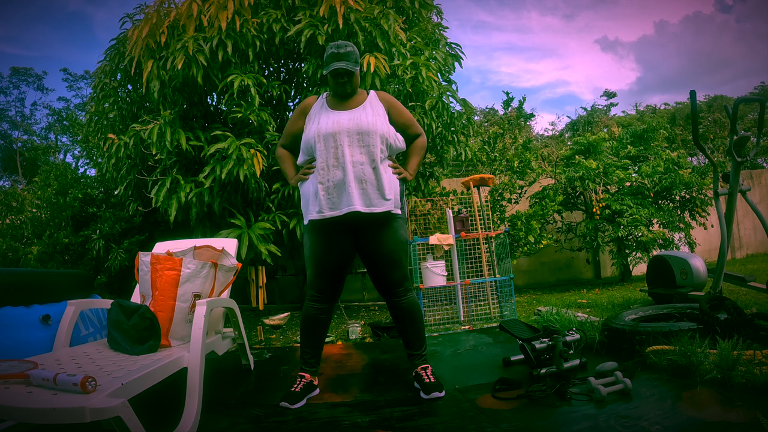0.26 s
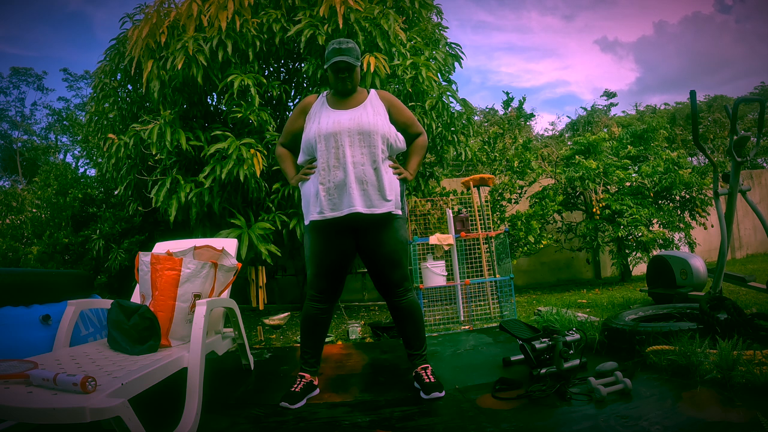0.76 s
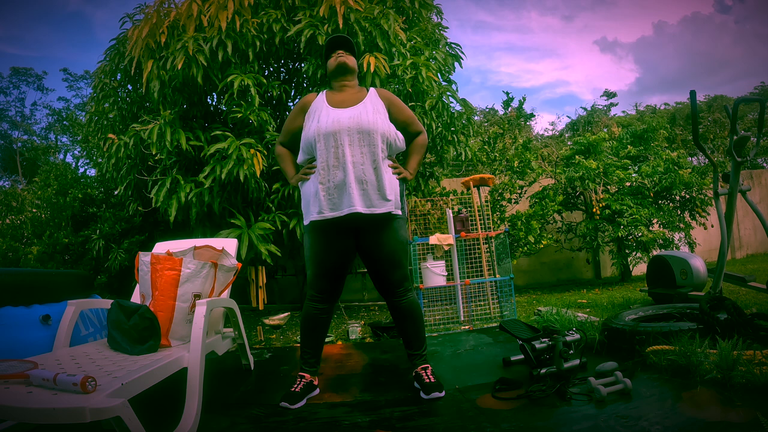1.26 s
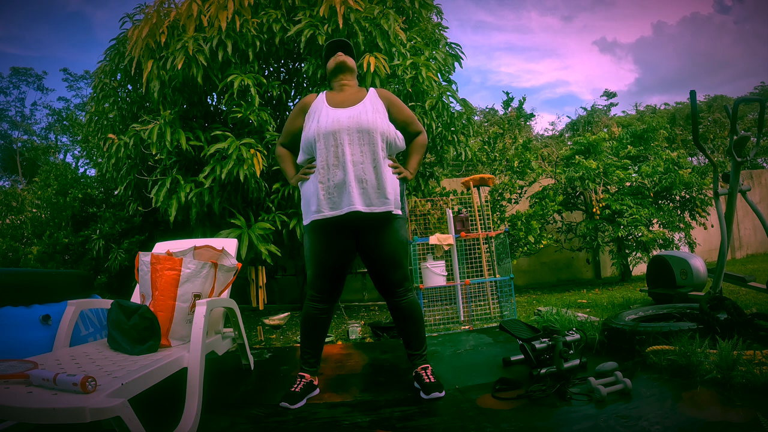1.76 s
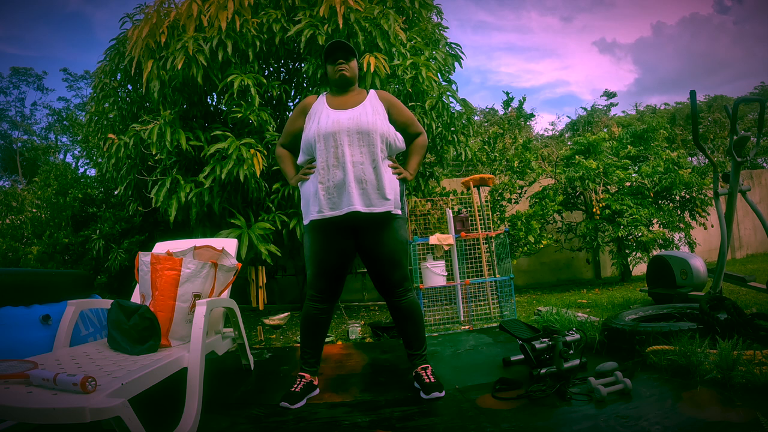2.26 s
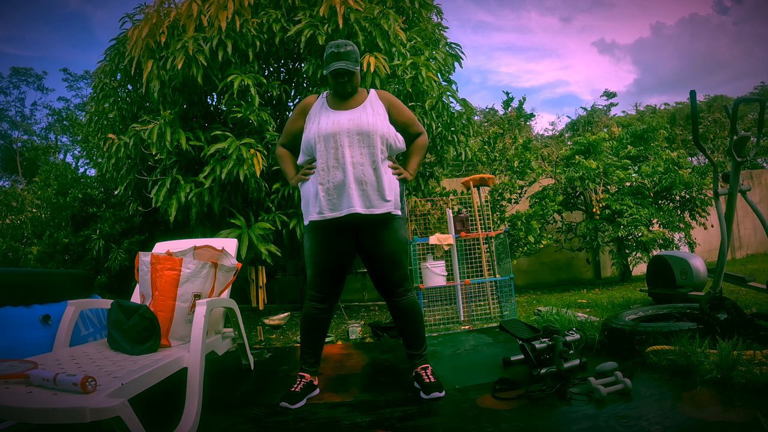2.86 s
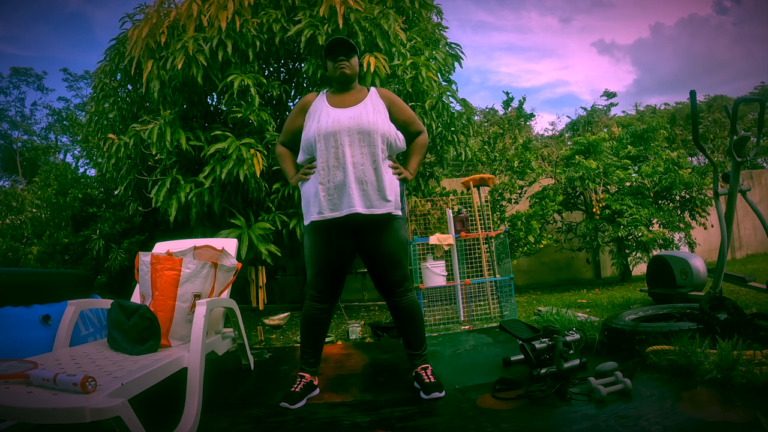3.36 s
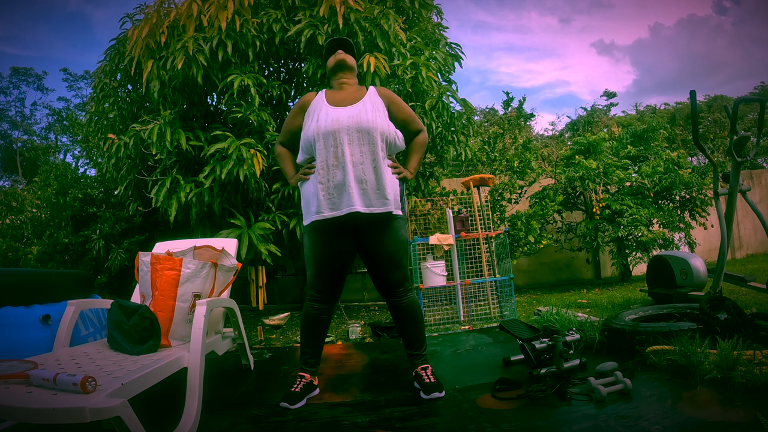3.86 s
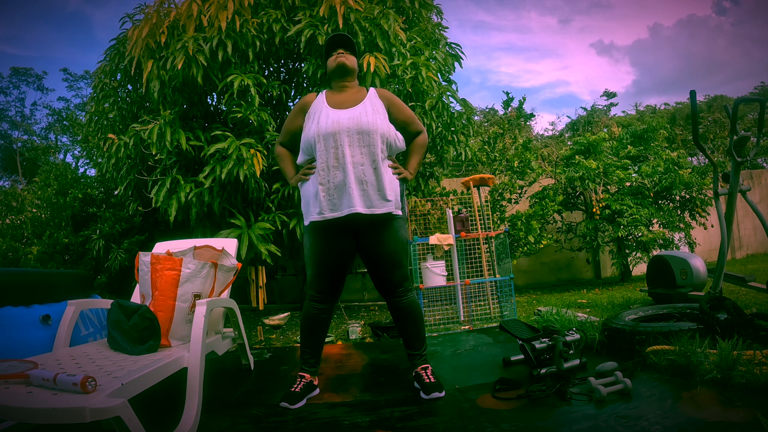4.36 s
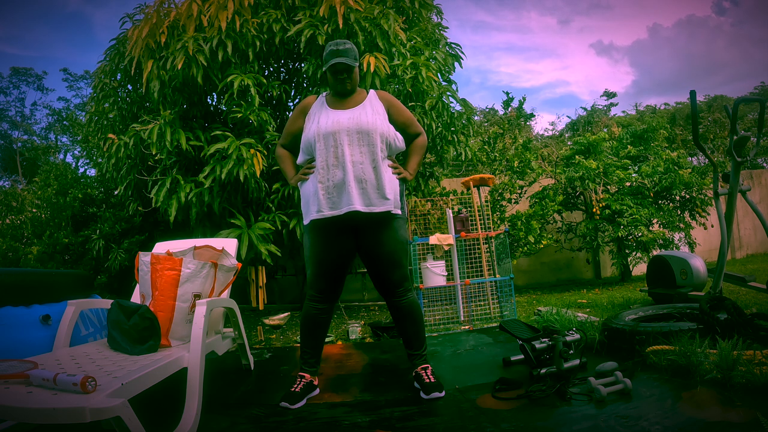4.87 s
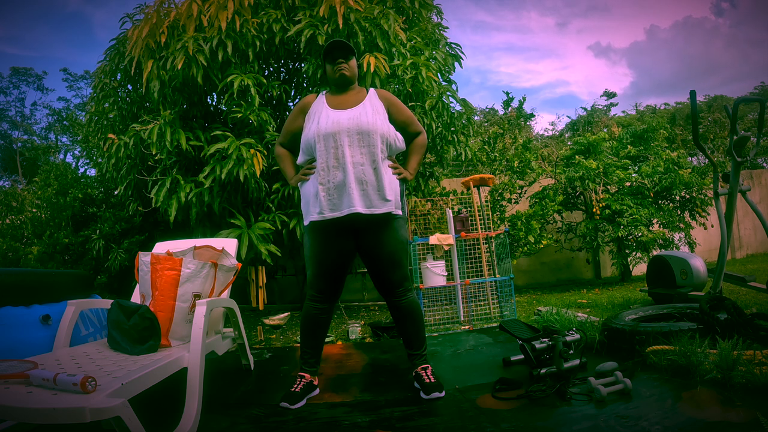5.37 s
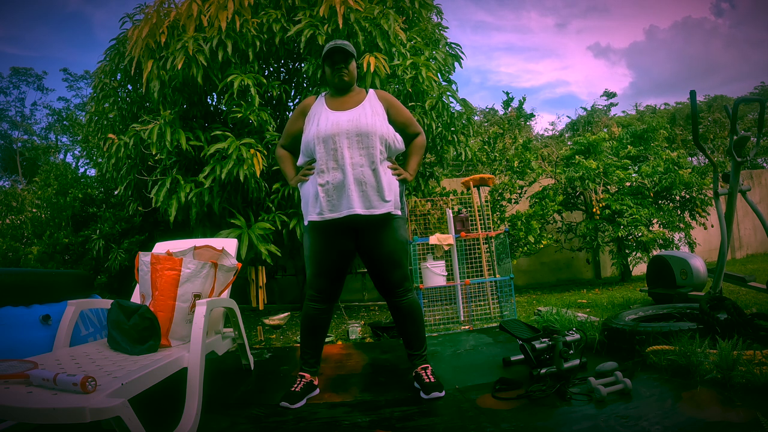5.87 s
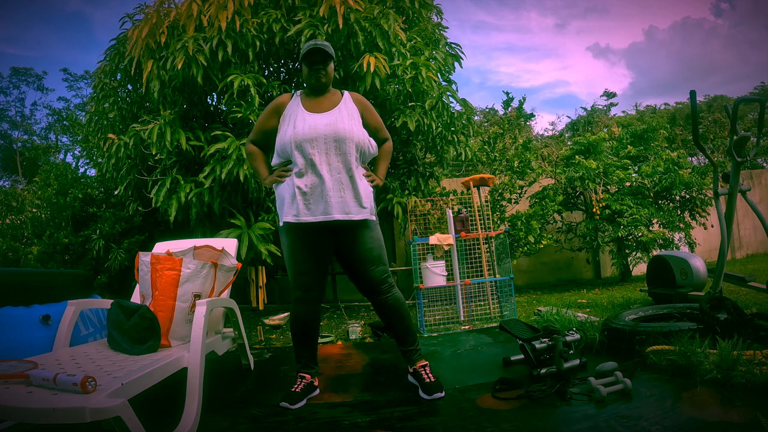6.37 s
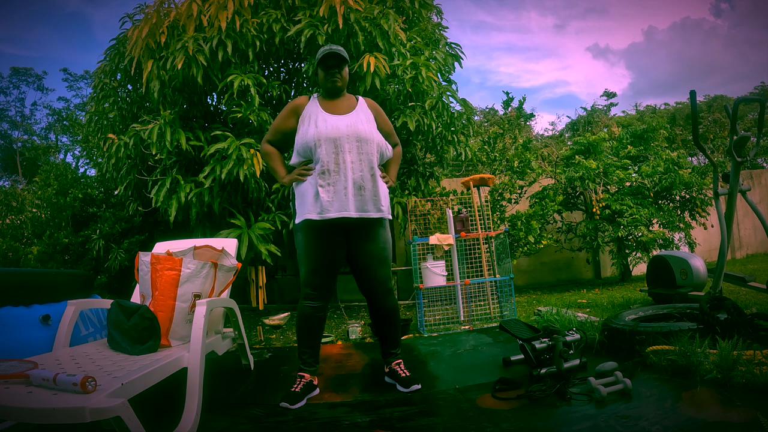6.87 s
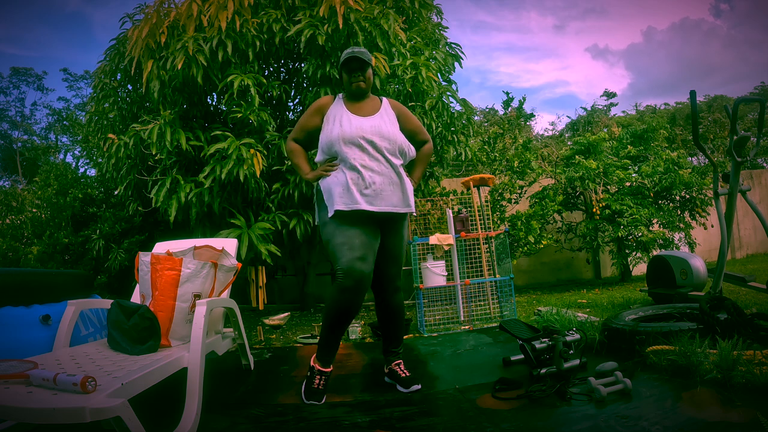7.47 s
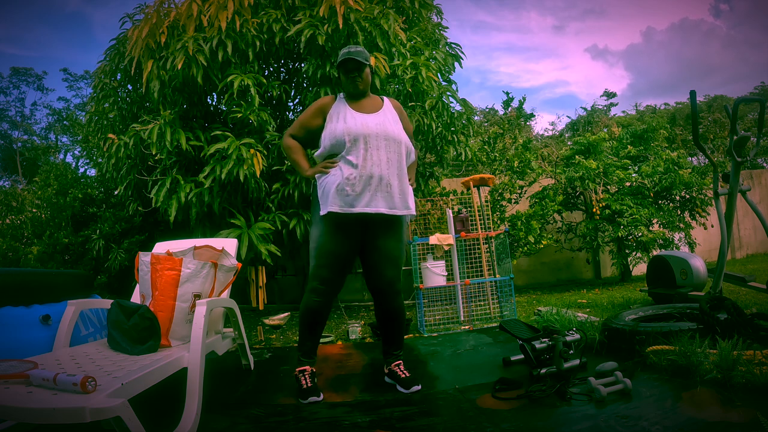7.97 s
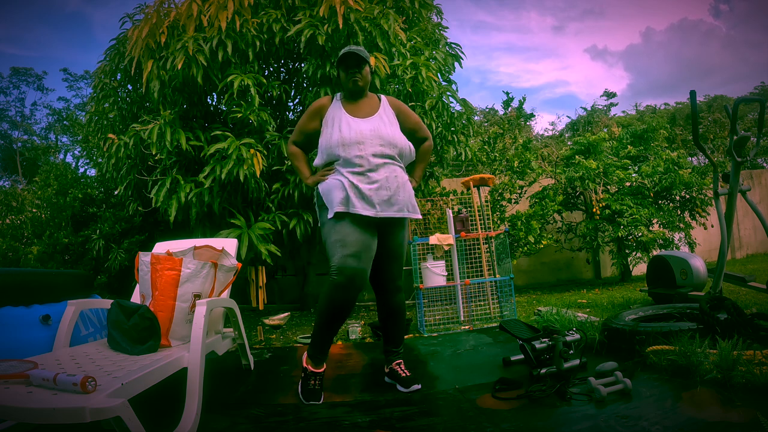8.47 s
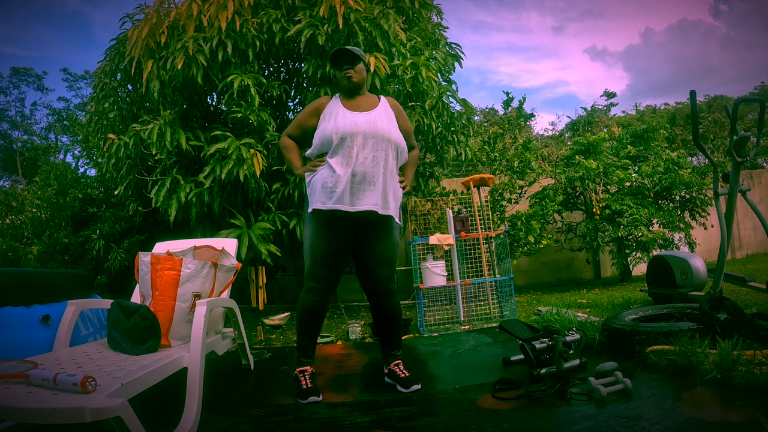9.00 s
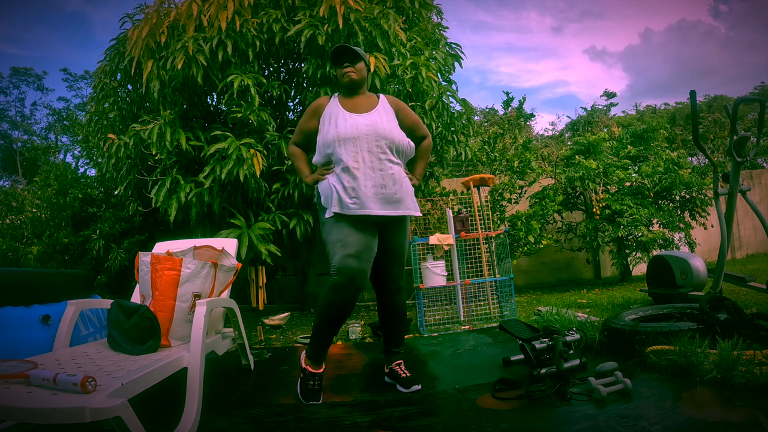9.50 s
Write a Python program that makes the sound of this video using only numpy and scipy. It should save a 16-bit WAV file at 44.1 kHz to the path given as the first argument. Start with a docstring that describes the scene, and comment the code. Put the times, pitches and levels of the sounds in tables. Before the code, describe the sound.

Low motor-like droning grows louder outdoors then eases, while someone shifting their stance makes soft thumps, hollow knocks and short scrapes.

```python
"""A garden, where a hollow, engine-like rumble grows louder, then eases: noise throbs unevenly in a few
slightly wavering resonances, nearer the right microphone port. Low noise is the air buffeting the microphone.
Someone shifting their stance makes deep thumps (low tones), hollow knocks (ringing noise) and gritty scuffs
(noise with moving treble). Behind lie an even outdoor hiss and faint airy high noise, stronger on the left,
that swells twice; both are shaped noise."""
import sys
import numpy as np
from scipy import signal
from scipy.fft import rfft, irfft
from scipy.io import wavfile
from scipy.ndimage import uniform_filter1d

SR = 44100
rng = np.random.default_rng(int(sys.argv[2]) if len(sys.argv) > 2 else 0)


def store_pcm(level_fs):
    """Save levels as 16-bit WAV."""
    pcm = np.round(np.clip(level_fs, -1, 1) * 32767).astype(np.int16)
    wavfile.write(sys.argv[1], SR, np.atleast_2d(pcm).T)


N = 429534
TIME, FREQ = np.arange(N) / SR, np.fft.rfftfreq(N, 1 / SR)  # s, Hz
THROB_HZ = 6  # upper rate of the rumble's chance throbbing


def rumble():
    """Turbulent noise rings several groups of resonances, whose pitch wavers together."""
    # strength of the rumble, heard in the drone and the body under it: (time [s], level [dB])
    drive_levels = [(0.0, -40.5), (0.1, -31.5), (0.25, -38.5), (0.36, -29.5), (0.49, -40), (0.57, -30.5),
                    (0.74, -36.5), (0.81, -28), (0.87, -38), (0.9, -27), (0.99, -42), (1.27, -30.5),
                    (1.32, -32.5), (1.36, -27.5), (1.44, -29.0), (1.54, -40), (1.58, -32), (1.77, -33.0),
                    (1.8, -39), (1.85, -31.0), (2.16, -39.5), (2.2, -27), (2.3, -40), (2.49, -23.5),
                    (2.54, -25.5), (2.57, -36), (2.68, -25.5), (2.81, -36.5), (2.84, -28.5), (2.98, -31),
                    (3.02, -21), (3.24, -30), (3.4, -20.5), (3.44, -31), (3.81, -22.5), (3.9, -37.5),
                    (3.95, -27.5), (4.17, -30.0), (4.2, -23), (4.27, -20), (4.38, -31), (4.41, -21),
                    (4.49, -30), (4.54, -24), (4.63, -34.5), (4.75, -28.0), (4.82, -43), (4.9, -21),
                    (4.93, -23.5), (4.95, -29.5), (5.15, -25), (5.19, -43), (5.22, -24), (5.3, -33),
                    (5.34, -21.5), (5.39, -29.5), (5.55, -24), (5.62, -37.5), (5.71, -24), (5.78, -39),
                    (5.92, -25.0), (6.14, -31.0), (6.2, -21.5), (6.25, -38), (6.29, -27.5), (6.43, -27.5),
                    (6.48, -20.0), (6.52, -21), (6.55, -32), (6.69, -26), (6.75, -17), (6.78, -26.5),
                    (6.97, -20), (7.02, -35.5), (7.16, -17.5), (7.23, -26), (7.29, -17.5), (7.42, -26.5),
                    (7.45, -18), (7.49, -29), (7.54, -21), (7.59, -32), (7.67, -22.5), (7.8, -34),
                    (7.9, -21), (7.94, -31.5), (8.04, -19.5), (8.07, -27.0), (8.24, -31), (8.28, -21.5),
                    (8.37, -30), (8.44, -19.5), (8.52, -38.5), (8.58, -23), (8.76, -33.5), (8.85, -27.5),
                    (8.9, -38), (8.94, -33), (9.11, -34.5), (9.21, -22.5), (9.27, -38.5), (9.33, -23.5),
                    (9.38, -32), (9.42, -26.5), (9.5, -32.5), (9.67, -21.5), (9.7, -31.5), (9.74, -32)]
    drive = curve(drive_levels)
    mix = body(drive) + drone(drive) + hum() + growl() + whirr() + moan()
    return wavering(mix, depth=0.005, hz=4)


def body(drive, level_db=-33, cruise_db=-26, share=0.74, throb_db=1.46):
    """The lowest resonances follow a share of the drive's slow swings about cruise_db, and throb by chance."""
    # resonances: (centre [Hz], width [Hz], level [dB])
    body_modes = [(138, 9.8, -7.5), (155.4, 25.3, 0), (172.7, 20, -3), (192, 29, -6)]
    # steep lower edge: (frequency [Hz], gain [dB])
    lower_edge = [(112, -20.5), (129, -1)]
    gain = resonances(body_modes) * amp(across(lower_edge))
    ring = steadied(noise_pair(gain, same=0.96, lead=0.75, balance_db=-11.0), span=0.21)
    slow_drive = uniform_filter1d(drive, size=SR // 3)
    return ring * amp(level_db + share * (slow_drive - cruise_db) + throb_db * throb(THROB_HZ))


def drone(drive):
    """Close resonances with their quick beats evened out, surging with the full drive."""
    # resonances: (centre [Hz], width [Hz], level [dB])
    drone_modes = [(215, 16, -5.5), (229.4, 15, -1), (237.2, 12, -3.5), (250, 80, -16)]
    # walls of the passband: (frequency [Hz], gain [dB])
    drone_band = [(150, -41), (195, -8), (215, -1.5), (240, -0.5), (262, -7.5), (320, -40.5)]
    ring = noise_pair(resonances(drone_modes), same=0.98, lead=0.95, balance_db=-11.0)
    ring = steadied(sustained(ring, drone_band, span=0.054), span=0.12)
    return ring * amp(drive)


def hum(throb_db=1.93):
    """A narrow resonance above the drone rings noise and swells on its own."""
    # resonances: (centre [Hz], width [Hz], level [dB])
    hum_modes = [(283.5, 9, 2), (275, 36, -13.5)]
    # (time [s], level [dB])
    hum_levels = [(0.0, -51.5), (0.28, -35.5), (0.76, -42.5), (0.92, -32.5), (1.2, -40), (1.32, -42.5),
                  (1.8, -35), (2.36, -42.5), (2.68, -30), (2.88, -39.5), (3.72, -27.5), (3.96, -41.5),
                  (4.12, -34.5), (4.24, -45), (4.72, -33), (4.8, -42), (5.24, -25.5), (5.36, -37),
                  (5.76, -29.0), (6.24, -35), (6.6, -27), (6.72, -36), (7.04, -23), (7.16, -42.5),
                  (7.32, -28.5), (7.84, -36.5), (8.16, -30.5), (8.32, -38.5), (8.52, -32), (8.84, -40),
                  (9.32, -35), (9.73, -35)]
    ring = steadied(noise_pair(resonances(hum_modes), same=1.0, lead=0.85, balance_db=-13.5), span=0.29)
    return ring * amp(curve(hum_levels) + throb_db * throb(THROB_HZ))


def growl(throb_db=1.5):
    """Resonances around 360 Hz ring noise and throb by chance."""
    # resonances: (centre [Hz], width [Hz], level [dB])
    growl_modes = [(309, 27, -10.5), (344.6, 14, -5), (361.8, 9.9, 0.5), (374, 61, -15)]
    # (time [s], level [dB])
    growl_levels = [(0.0, -56), (0.6, -53), (0.8, -44.5), (2.6, -50.5), (3.15, -44.5), (5.94, -41.5),
                    (6.79, -36), (8.64, -38.5), (8.94, -44), (9.74, -47)]
    ring = steadied(noise_pair(resonances(growl_modes), same=0.96, lead=1.0, balance_db=-12.0), span=0.4)
    return ring * amp(curve(growl_levels) + throb_db * throb(THROB_HZ))


def whirr(trim_db=-0.5, throb_db=1.76):
    """Resonances just over 400 Hz ring noise and throb by chance."""
    # resonances: (centre [Hz], width [Hz], level [dB])
    whirr_modes = [(406.8, 14, 0), (436, 11, -0.5), (430, 200, -16)]
    # (time [s], level before the trim [dB])
    whirr_levels = [(0.0, -64.5), (1.32, -49.5), (1.56, -55), (1.96, -54), (2.52, -62.5), (2.72, -47),
                    (2.92, -57.5), (3.28, -49), (4.84, -52.5), (6.04, -55.5), (6.24, -44.5), (7.64, -46),
                    (7.88, -56), (8.28, -45.5), (8.84, -51), (9.73, -55)]
    ring = steadied(noise_pair(resonances(whirr_modes), same=1.0, lead=0.75, balance_db=-13.5), span=0.91)
    return ring * amp(curve(whirr_levels) + trim_db + throb_db * throb(THROB_HZ))


def moan(throb_db=0.8):
    """Faint resonances around 600 Hz ring noise that the two ports share only in part."""
    # resonances: (centre [Hz], width [Hz], level [dB])
    moan_modes = [(489, 43, -7), (500, 12, -7), (518, 7.4, -2.5), (563.6, 16, -1), (611.7, 26, 1.5),
                  (627, 12, -1.5), (660, 150, -10.5), (800, 33, -9), (810, 130, -18.5)]
    # (time [s], level [dB])
    moan_levels = [(0.0, -64), (0.5, -63), (1.2, -55.5), (2.1, -57), (2.65, -55.5), (4.8, -56.5),
                   (5.02, -51), (5.2, -55.5), (6.1, -55), (6.85, -51), (7.2, -58.5), (7.55, -56),
                   (7.7, -56.5), (8.7, -57), (9.04, -62.5), (9.44, -49.5), (9.74, -59)]
    ring = steadied(noise_pair(resonances(moan_modes), same=0.33, lead=0.62, balance_db=-11.5), span=1.0)
    return ring * amp(curve(moan_levels) + throb_db * throb(THROB_HZ))


def buffet(trim_db=-0.5, gust_db=4, gust_hz=6.7):
    """Moving air presses on the microphone: lumpy low noise in random gusts."""
    # spectrum of the buffeting air: (frequency [Hz], gain [dB])
    buffet_colour = [(5, -13), (14, -5), (30, 4), (48, 0), (59, 3), (73, -7), (88, 2.5), (108, -11),
                     (180, -17), (400, -71.5)]
    # strength of the air on the microphone: (time [s], level before the trim [dB])
    buffet_levels = [(0, -57.5), (0.66, -49.5), (1.05, -57), (1.35, -53), (1.62, -55.5), (2.05, -47),
                     (2.4, -51), (3.25, -48.5), (3.6, -51), (4.2, -53), (4.8, -49.5), (6.0, -50),
                     (6.7, -50.5), (7.95, -46), (8.4, -49), (9.1, -45.5), (9.38, -42), (9.55, -45),
                     (9.74, -38)]
    air = noise_pair(amp(across(buffet_colour)), same=0.93, lead=0.05, balance_db=-2.5)
    return steadied(air, span=0.18) * amp(curve(buffet_levels) + trim_db + gust_db * throb(gust_hz))


def thumps(left_db=-7, right_db=1.5, unsteady=0.35):
    """Each footfall is a soft shove: a short bump, a boom, then a deep ring that builds later and lasts longer."""
    # what a thump rings: (pitch [Hz], width [Hz], level [dB], delay [s], rise [s], decay [s]); times get stretched
    thump_modes = [(34, 16, -7.5, 0.003, 0.021, 0.05), (57.5, 4, -5, 0.035, 0.048, 0.07),
                   (87.7, 4.8, -4, 0.002, 0.052, 0.044), (103.2, 12, -6, 0.002, 0.044, 0.035),
                   (152, 23, -1, 0.002, 0.03, 0.022)]
    # footfalls, before the port gains:
    # (time [s], level [dB], gain under 70 Hz [dB], gain over 120 Hz [dB], stretch [factor])
    footfalls = [(5.04, -36, -2.5, 4, 1.2), (5.6, -37.5, 3, -8, 0.65), (6.345, -25.5, -7, 0, 0.77),
                 (6.852, -20.5, 0, 2.5, 1.28), (7.18, -25, -5.5, -2, 0.85), (7.285, -33, -2, 15.5, 0.9),
                 (7.354, -15, -3, -3, 1.05)]
    out = np.zeros(N)
    for hz, width, mode_db, delay, rise, decay in thump_modes:
        pitch = hz + unsteady * width * wander(width)
        ring = evened(np.sin(2 * np.pi * np.cumsum(pitch) / SR))
        for s, db, deep_db, high_db, stretch in footfalls:
            colour_db = deep_db * (hz < 70) + high_db * (hz > 120)
            shape = swell(s + delay * stretch, rise * stretch, decay * stretch)
            out += amp(db + mode_db + colour_db) * shape * ring
    return out * amp([[left_db], [right_db]])


def knocks(rise=0.021, decay=0.024):
    """Soft hollow knocks as the weight shifts from foot to foot: short swells of ringing noise."""
    # (time [s], level [dB])
    knock_levels = [(6.31, -48), (6.39, -46), (6.678, -41), (6.84, -40), (6.94, -44), (6.985, -48)]
    # what a knock rings: (centre [Hz], width [Hz], level [dB])
    knock_modes = [(613, 20, 4), (690, 260, -27)]
    ring = steadied(noise_pair(resonances(knock_modes), same=0.57, lead=0.4, balance_db=-15.5), span=0.04)
    return ring * sum(amp(db) * swell(s, rise, decay) for s, db in knock_levels)


def scuffs(grit_db=1.5, patch_db=3.5, peak_db=6, peak_octaves=0.45, skirt_db=-3.5,
           sag_oct_per_s=32, lowest_hz=1270):
    """A sole drags to a stop: grit crackles, brief resonances come and go, and the brightest part sinks."""
    # (time [s], level [dB], rise [s], hold [s], decay [s], brightest at the start [Hz], treble tilt [dB/octave])
    strokes = [(6.664, -52, 0.0079, 0.013, 0.014, 3300, 0.5), (6.783, -42.5, 0.025, 0.025, 0.025, 4000, -2),
               (7.188, -41.5, 0.02, 0.022, 0.022, 2400, -0.5),
               (7.28, -40.5, 0.038, 0.02, 0.019, 4500, -1.5)]
    # spectrum of the rubbing: (frequency [Hz], gain [dB])
    scuff_colour = [(400, -25), (900, -7.5), (1300, 5.5), (2000, 2.5), (3000, 2), (4100, -0.5),
                    (6000, -7.5), (8500, -23), (13000, -36.5), (16000, -49)]
    rub = noise_pair(amp(across(scuff_colour)), same=0.6, lead=-0.49, balance_db=4.5)
    rub = steadied(rub, span=0.015)
    out = np.zeros((2, N))
    for s, db, rise, hold, decay, start_hz, tilt_db in strokes:
        part = slice(round(s * SR), round(s * SR) + SR // 4)
        hz, t, z = signal.stft(rub[:, part], SR, nperseg=256, noverlap=192)
        octave = np.log2(np.maximum(hz, 1))[:, None]
        lowest = np.log2(lowest_hz)
        brightest = np.maximum(np.log2(start_hz) - sag_oct_per_s * t, lowest)
        # brief resonances: chance patches, smoothed over frequency, then time
        patches = uniform_filter1d(rng.standard_normal(z.shape[1:]), size=3, axis=0)
        patches = evened(uniform_filter1d(patches, size=11, axis=1))
        grain = evened(amp(patch_db * patches + grit_db * rng.standard_normal(len(t))))
        peak = peak_db / (1 + ((octave - brightest) / peak_octaves) ** 2)
        colour_db = skirt_db + peak + tilt_db * np.maximum(octave - lowest, 0)
        stroke = signal.istft(z * grain * amp(colour_db), nperseg=256, noverlap=192)[1][:, :SR // 4]
        out[:, part] += amp(db) * swell(s, rise, decay, hold)[part] * stroke
    return out


def hiss(settled_db=-49, rise_db=5.5, settle_s=2.87, flicker_db=0.97, flicker_hz=12):
    """Even outdoor hiss of shaped noise starts rise_db low and levels off; under 2600 Hz it flickers slightly."""
    # spectrum of the outdoor hiss: (frequency [Hz], gain [dB])
    hiss_colour = [(850, -9), (1270, 0.5), (1540, 0.5), (1760, 2.5), (2150, -7), (2620, -14.5),
                   (3080, -11.5), (3900, -13), (4400, -16.5), (5500, -13), (7500, -25), (8500, -33.5),
                   (12500, -40), (15500, -50)]
    # the hiss at the two microphone ports:
    # (frequency [Hz], coherence [0-1], phase by which left leads [rad], left over right [dB])
    ports = [(700, 0.28, 0.85, -14), (1180, 0.45, -1.33, -1), (1720, .92, -1.57, 0.5),
             (2600, 0.18, -1.4, 1.5), (3100, 0.59, -1.45, 3), (3930, 0.59, -1.1, 6.5),
             (4460, 0.39, -1.1, 3.5), (5250, 0.6, -0.87, 6), (6200, 0.21, -1.4, 3), (7650, 0.7, 0.13, 7),
             (8600, .05, 0, 17), (15000, .05, 0, 23)]
    same, lead, balance_db = (across(ports, axis) for axis in (1, 2, 3))
    air = noise_pair(amp(across(hiss_colour)), same, lead, balance_db)
    lower = irfft(rfft(air) * (FREQ < 2600), N)
    flicker = amp(flicker_db * wander(flicker_hz)) - 1
    level_db = settled_db - rise_db * np.exp(-TIME / settle_s)
    return (air + lower * flicker) * amp(level_db)


def high_air(centre_hz=8500, width_hz=2200):
    """Faint airy high noise, stronger on the left, that swells twice: one broad resonance of noise."""
    # (time [s], level [dB], length [s])
    air_swells = [(0.36, -78.5, 1.3), (6.997, -80.5, 1.3)]
    level = np.zeros(N)
    for s, db, length in air_swells:
        progress = np.clip((TIME - s) / length, 0, 1)
        level += amp(db) * np.sqrt(abs(np.sin(np.pi * progress)))
    return level * noise_pair(resonances([(centre_hz, width_hz, 0)]), same=0.1, lead=0, balance_db=14.5)


def amp(db):
    """Decibels to gain."""
    return 10 ** (np.asarray(db) / 20)


def evened(x):
    """Scales to rms 1."""
    return x / np.sqrt(np.mean(x ** 2) + 1e-20)


def curve(rows, axis=1):
    """One column of a control curve at every sample."""
    rows = np.asarray(rows)
    return np.interp(TIME, rows[:, 0], rows[:, axis])


def across(rows, axis=1):
    """One column of a frequency table at every bin, interpolated over log frequency."""
    rows = np.asarray(rows)
    return np.interp(np.log(FREQ + 1), np.log(rows[:, 0]), rows[:, axis])


def noise_pair(gain, same, lead, balance_db):
    """Coloured noise at both ports, partly shared, left leading by lead radians, with a mid rms of 1."""
    a, b = rfft(rng.standard_normal((2, N)))
    same = np.clip(same, 0, 1)
    left = (same * a + np.sqrt(1 - same ** 2) * b) * np.exp(1j * lead) * amp(balance_db)
    pair = irfft(np.array([left, a]) * gain / (1 + amp(balance_db)), N)
    return pair / pair.mean(0).std()


def steadied(pair, span):
    """Takes out chance swells slower than span seconds and keeps the quick flutter."""
    window = signal.windows.hann(max(int(span * SR), 9))
    weight = signal.fftconvolve(np.ones(N), window, "same")
    power = signal.fftconvolve(pair.mean(0) ** 2, window, "same") / weight
    return pair / np.sqrt(abs(power) + 1e-9)


def sustained(pair, band, span):
    """Evens out the quickest beats of a ringing sound, so that it holds longer swells inside its band."""
    return irfft(rfft(steadied(pair, span)) * amp(across(band)), N)


def resonances(modes):
    """Gain of a set of steep-sided resonances whose powers add."""
    power = sum((amp(db) / (1 + (2 * (FREQ - hz) / width) ** 2)) ** 2 for hz, width, db in modes)
    return np.sqrt(power)


def wander(hz):
    """Smooth chance of rms 1, changing up to about hz times a second."""
    return evened(irfft(rfft(rng.standard_normal(N)) * np.exp(-(FREQ / hz) ** 2), N))


def throb(hz):
    """Uneven pulsing of rms 1, somewhat under hz times a second, with no slow drift."""
    return evened(np.gradient(wander(hz)))


def wavering(pair, depth, hz):
    """Bends the pitch up and down by chance, by the rms share depth."""
    clock = np.cumsum(1 + depth * throb(hz)) / SR
    return np.array([np.interp(clock, TIME, port) for port in pair])


def swell(s, rise, decay, hold=0):
    """A rounded attack from time s, a hold, then an exponential decay."""
    t = np.maximum(TIME - s, 0)
    attack = np.sin(np.pi / 2 * np.minimum(t / rise, 1)) ** 2
    return attack * np.exp(-np.clip((t - rise - hold) / decay, 0, 20))


def scene():
    """All sources at the two ports."""
    return rumble() + buffet() + thumps() + knocks() + scuffs() + hiss() + high_air()


def record(dry, edge_hz=15600):
    """The recorder's band limit: a steep low-pass filter."""
    lowpass = signal.firwin(511, edge_hz, window=("kaiser", 9), fs=SR)
    return signal.oaconvolve(dry, lowpass[None], "same")


dry = scene()
out = record(dry)
store_pcm(out)
```